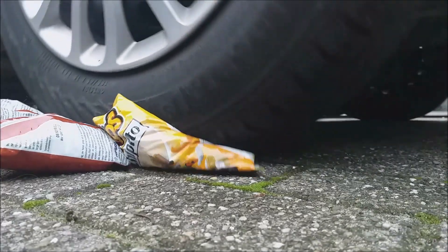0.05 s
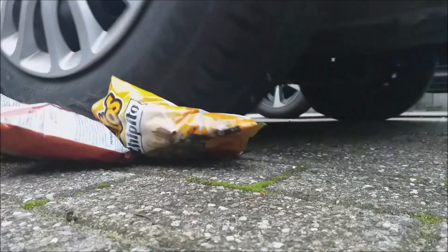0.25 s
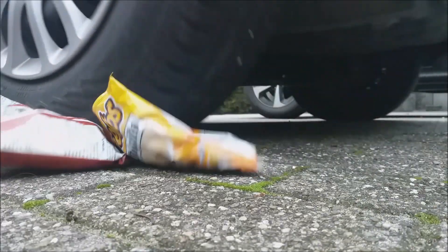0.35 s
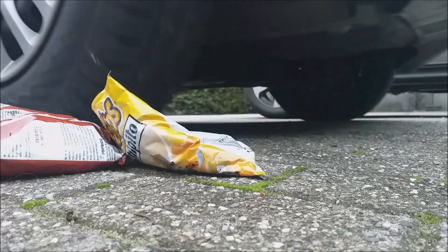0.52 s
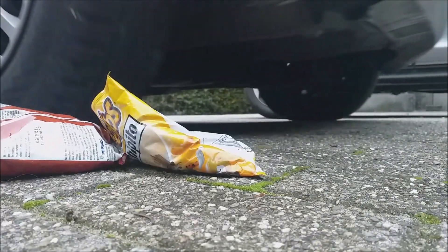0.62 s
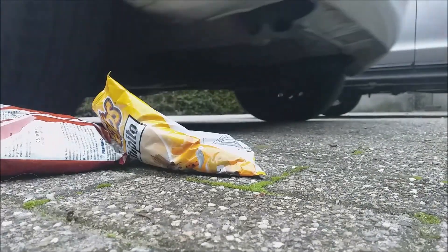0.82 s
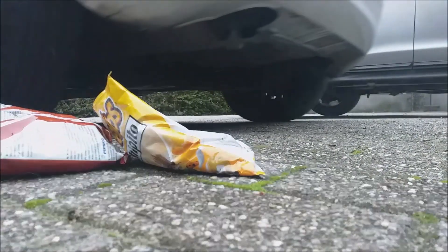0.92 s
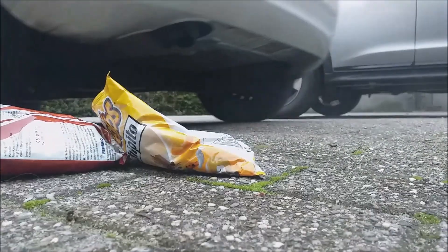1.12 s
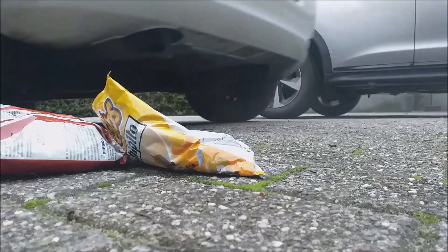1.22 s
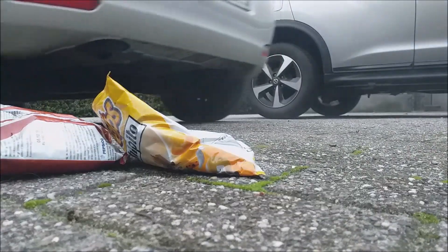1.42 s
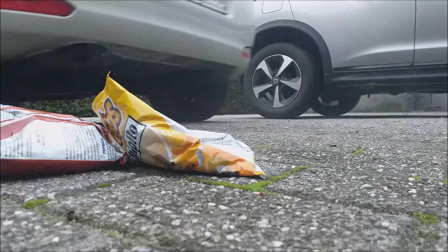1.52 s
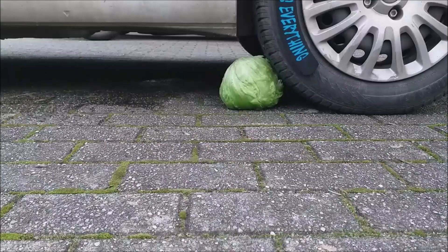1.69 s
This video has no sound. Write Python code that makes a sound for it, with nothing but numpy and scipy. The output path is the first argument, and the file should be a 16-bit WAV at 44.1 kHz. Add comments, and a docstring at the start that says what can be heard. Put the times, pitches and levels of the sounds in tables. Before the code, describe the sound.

A foil snack bag crackles loudly as a car rolls over it, bursts, and settles in faint ticks

```python
"""A car creeps over an air-filled snack packet close to the microphone: dense ringing grains crackle, foil snaps
in hiss and short tones, and a slipping sheet squeaks. The bag then bursts: pulses ring its hollow, with a
noise crack and scattered echoes. Foil settles in faint ticks over an idling engine of sine orders and street
air of coloured noise; the engine pulls a little harder late on. Just before the end the sound is cut,
leaving a thin, dying remainder, and comes back faint."""
import sys
import numpy as np
from scipy import signal
from scipy.fft import rfft, irfft
from scipy.io import wavfile

SR = 44100
rng = np.random.default_rng(int(sys.argv[2]) if len(sys.argv) > 2 else 0)


def attenuation_scalar(level_db):
    """Turn a level in dB into a linear amplitude multiplier (20 dB per decade)."""
    decades = np.asarray(level_db, float) / 20
    return 10 ** decades


def master_out(mix):
    """Clip the mix to full scale and print it as 16-bit PCM to the path in sys.argv[1]."""
    frames = np.transpose(np.atleast_2d(mix))
    ceiling = np.clip(frames, -1, 1)
    pcm = np.round(ceiling * 32767).astype(np.int16)
    wavfile.write(sys.argv[1], SR, pcm)


N = 77175

# colour of foil and crisps: [frequency_hz, density_db (per Hz, relative)]
FOIL_COLOUR = [(80, -45.5), (150, -12.5), (300, -4.5), (450, -8), (700, -1), (1000, -5), (2000, -4.5),
               (3800, -4.5), (5500, -7), (7800, -8.5), (9000, -21.5), (11000, -16), (15000, -17),
               (16500, -40)]


def rms_one(x):
    """Scales a signal to rms 1."""
    return x / np.sqrt(np.mean(x ** 2) + 1e-20)


def in_time(rows):
    """Draws straight lines between (second, value) points."""
    s, column = np.transpose(rows)
    return np.interp(np.arange(N) / SR, s, column)


def at_hz(points, hz):
    """Reads a (Hz, value) curve on a logarithmic frequency axis."""
    table_hz, values = np.transpose(points)
    return np.interp(np.log(hz), np.log(table_hz), values)


def drift(rate_hz):
    """Slow random wander of rms 1: noise through a double low-pass pole."""
    r = np.exp(-2 * np.pi * rate_hz / SR)
    wander = signal.lfilter([1], [1, -2 * r, r * r], rng.standard_normal(N + SR))
    return rms_one(wander[SR:])  # the first second lets the filter settle


def ring(clicks, hz, t60_s):
    """Two-pole resonator: a unit click starts a decaying sine of height 1."""
    r, w = attenuation_scalar(-60 / (t60_s * SR)), 2 * np.pi * hz / SR
    return signal.lfilter([0, np.sin(w)], [1, -2 * r * np.cos(w), r * r], clicks + 1e-18)


def dying(start_s, t60_s):
    """Envelope that jumps to 1 and decays by 60 dB in t60_s."""
    t = np.arange(N) / SR - start_s
    return (t >= 0) * attenuation_scalar(-60 * np.maximum(t, 0) / t60_s)


def high_pass(x, hz):
    """Second-order Butterworth bass cut."""
    return signal.sosfilt(signal.butter(2, hz, "high", fs=SR, output="sos"), x)


def coloured(x, spectrum):
    """White input through a causal (minimum-phase) filter given in dB per Hz; rms 1."""
    hz = np.maximum(np.arange(N // 2 + 1) * SR / N, 1)
    cepstrum = irfft(np.log(attenuation_scalar(at_hz(spectrum, hz))), N)
    fold = np.where(np.arange(N) < N / 2, 2., 0.)
    fold[0] = 1
    response = np.exp(rfft(cepstrum * fold))
    return rms_one(irfft(rfft(x) * response, N))


def crackle():
    """Dense clumped grains, each a few cycles at its own pitch, over the rustle of the whole sheet."""
    # pressure of the tyre on the bag, as crackle level: [time_s, level_db]
    crush = [(0, -54), (.034, -49.5), (.085, -54), (.12, -50.5), (.151, -54.5), (.157, -67.5), (.17, -51),
             (.285, -49), (.305, -52), (.398, -46), (.418, -50), (.444, -49), (.456, -54), (.4885, -56.5),
             (.491, -41), (.54, -55.5), (.6, -63), (.69, -70.5), (.775, -75), (.79, -80.5), (1.4, -90.5),
             (1.68, -75.5)]
    grains_per_s, grain_spread_db, grain_cycles = 11000, 4.0, 11.0  # a grain loses 60 dB in grain_cycles
    clump_db, clump_rate_hz, rustle_db = 1.2, 90, -4
    sizes = attenuation_scalar(grain_spread_db * np.minimum(rng.exponential(1, N), 5)) * rng.choice([-1, 1], N)
    clump = attenuation_scalar(clump_db * drift(clump_rate_hz))
    born = rng.random(N) < grains_per_s * clump / SR
    pitches_hz, dealt = np.geomspace(150, 15500, num=28), rng.integers(0, 28, N)
    grains = sum(ring(sizes * born * (dealt == k), hz, grain_cycles / hz) * hz
                 for k, hz in enumerate(pitches_hz))
    sheet = rms_one(grains) + attenuation_scalar(rustle_db) * rng.standard_normal(N)
    return attenuation_scalar(in_time(crush)) * clump * coloured(sheet, FOIL_COLOUR)


def snaps():
    """Each snap: a burst of foil hiss, duller for low snaps, that dies fast, with a short ring."""
    # single snaps and ticks of foil: [start_s, level_db, pitch_hz, hiss_db (relative to level_db)]
    snap_rows = [(0.016, -40, 1800, -12), (0.033, -32, 2950, -15), (0.072, -43, 2700, -14),
                 (0.0947, -37, 2230, -7), (0.1151, -30, 3900, -18), (0.1335, -47, 2310, 1),
                 (0.142, -41.5, 754, -9), (0.1762, -32, 4620, -13), (0.2074, -31, 4200, -9),
                 (0.2375, -37.5, 1490, -8), (0.2627, -39, 1610, -15), (0.3442, -36, 3930, -11),
                 (0.3529, -32.5, 3900, -13), (0.3787, -30.5, 7300, -12.5), (0.388, -27.5, 2590, -12),
                 (0.3992, -28, 2020, -16), (0.4135, -29, 3940, -10), (0.428, -26.5, 4070, -14),
                 (0.4326, -21, 7400, -28), (0.4362, -28, 3700, -18), (0.44, -35, 1980, -17),
                 (0.4441, -26.5, 4730, -14.5), (0.4752, -42, 1900, -5.5), (0.537, -39, 435, -32),
                 (0.582, -42, 594, -18), (0.5975, -41.5, 3750, -11.5), (0.604, -46, 372, -22),
                 (0.623, -52, 5080, -10), (0.634, -48.5, 603, -20), (0.649, -49, 5200, -6.5),
                 (0.6659, -41.5, 2400, -6), (0.666, -58, 704.6, -25), (0.682, -54, 650, -22),
                 (0.7196, -57, 1740, -2), (0.728, -51.5, 704, -18), (0.7558, -52, 2170, -6),
                 (0.7622, -55, 4500, -6), (0.7704, -55.5, 2360, -2), (0.8495, -56.5, 3240, -26),
                 (0.8632, -50, 2080, -21), (0.8843, -54.5, 1900, -8.5), (0.9271, -51.5, 1388, -17),
                 (1.0159, -63, 5500, -10), (1.03, -64, 5000, -9), (1.0423, -53.5, 1780, -11.5),
                 (1.056, -60, 3000, -14), (1.0978, -54, 1830, -28), (1.4722, -61, 1900, -5.5),
                 (1.5028, -61.5, 2450, -3), (1.5472, -52, 1600, -6.5), (1.6013, -50.5, 7600, -10),
                 (1.628, -56, 1680, -8.5)]
    hiss_t60_s, hiss_reach = 0.013, 3.5  # the hiss fades above hiss_reach times the pitch
    ring_cycles, ring_db, rise_cycles = 9, -1.5, 0.27
    t = np.arange(SR // 20) / SR
    out, hiss = np.zeros(N), coloured(rng.standard_normal(N), FOIL_COLOUR)
    for start_s, level_db, hz, hiss_db in snap_rows:
        i = int(start_s * SR)
        keep = np.exp(-2 * np.pi * hiss_reach * hz / SR)
        dull = signal.lfilter([1 - keep], [1, -keep], hiss[i:i + len(t)])
        rise = 1 - np.exp(-t * hz / rise_cycles)
        tone = attenuation_scalar(ring_db - 60 * t * hz / ring_cycles) * np.sin(2 * np.pi * hz * t) * rise
        burst_of_hiss = attenuation_scalar(hiss_db - 60 * t / hiss_t60_s) * dull
        out[i:i + len(t)] += attenuation_scalar(level_db) * (tone + burst_of_hiss)
    return out


def squeak():
    """Foil squeaks as it slips: a brief swelling tone with its octave."""
    start_s, length_s, pitch_hz, level_db, octave_db = .139, .036, 1725, -57.5, -1
    t = np.arange(N) / SR - start_s
    phase = 2 * np.pi * pitch_hz * t
    swell = np.sin(np.pi * np.clip(t / length_s, 0, 1))
    tones = np.sin(phase) + attenuation_scalar(octave_db) * np.sin(2 * phase)
    return attenuation_scalar(level_db) * np.sqrt(2) * swell * tones


def seam_and_hollow(burst):
    """The seam tears in quick pressure pulses, each with a slower dip, that ring the hollow."""
    # hollow of bag and wheel arch: [pitch_hz, level_db, t60_s]
    hollow = [(138, -28.5, 0.12), (193.4, -19.5, 0.073), (288, -27, 0.0765), (471.4, -6.5, 0.2),
              (733.3, -14.5, 0.077), (895, -21, 0.086), (1178, -14.5, 0.067), (1900, -21.5, .03),
              (2562, -21.5, 0.023), (3800, -25, .03)]
    pulse_s, suction_s, suction_share = .00025, .0008, 1.0
    t = np.arange(N) / SR
    pulses = sum(attenuation_scalar(db) * np.exp(-((t - s - pulse_s) / (pulse_s / 2)) ** 2) for s, db in burst)
    keep = np.exp(-1 / (suction_s * SR))
    suction = suction_share * signal.lfilter([1 - keep], [1, -keep], pulses)
    area = pulse_s / 2 * SR * np.sqrt(np.pi)  # of a pulse of height 1, in samples
    ringing = sum(attenuation_scalar(db) * ring(pulses / area, hz, t60_s) for hz, db, t60_s in hollow)
    return pulses - suction + ringing


def gulp():
    """The trapped air rings while the tear opens: a few swelling cycles, inverted."""
    start_s, length_s, pitch_hz, level_db = .4894, .007, 660, -25.5
    t = np.arange(N) / SR - start_s
    swell = np.sqrt(np.sin(np.pi * np.clip(t / length_s, 0, 1)) + 1e-15)
    return -attenuation_scalar(level_db) * swell * np.sin(2 * np.pi * pitch_hz * t)


def crack(burst_s):
    """Bright noise that starts just after the first pulse and dies fast."""
    level_db, t60_s, lag_s, from_hz = -31, 0.0095, .0006, 2000
    bright = high_pass(rng.standard_normal(N), from_hz)
    return attenuation_scalar(level_db) * bright * dying(burst_s + lag_s, t60_s)


def scattered_echoes(burst_s):
    """Echoes from under the car and off the walls: half-octave noise bands, each dying at its own pace."""
    # colour of the echoes: [frequency_hz, density_db (per Hz, relative)]
    scatter = [(50, -30.5), (100, -17.5), (170, -10.5), (300, -1.5), (450, -2.5), (750, -3), (1340, -13),
               (2650, -13.5), (4120, -23.5), (7230, -32.5), (16000, -36.5)]
    # how the echoes die: [frequency_hz, t60_s]
    scatter_t60 = [(60, .25), (300, .16), (700, .12), (2000, .13), (16000, .1)]
    level_db, build_s = -30, 0.0063
    white, edges = rng.standard_normal((2, N)), 60 * 2 ** np.arange(0, 8.1, .5)
    tail, power = 0, 0
    for k, (low, high) in enumerate(zip(edges, edges[1:])):
        hz = np.sqrt(low * high)
        band_pass = signal.butter(2, [low, high], "band", fs=SR, output="sos")
        # neighbouring bands take turns on two noises
        band = attenuation_scalar(at_hz(scatter, hz)) * signal.sosfilt(band_pass, white[k % 2])
        tail = tail + band * dying(burst_s, at_hz(scatter_t60, hz))
        power = power + np.mean(band ** 2)
    build = np.clip((np.arange(N) / SR - burst_s) / build_s, 0, 1) ** 2
    return attenuation_scalar(level_db) * build * tail / np.sqrt(power)


def pop():
    """The bag bursts: pulses in the hollow, gulp, crack and echoes, with the bass cut."""
    # steps of the tearing seam: [start_s, level_db (before the bass cut)]
    burst = [(.4889, -21), (.4901, -23), (.5002, -28)]
    burst_s = burst[0][0]
    out = seam_and_hollow(burst) + gulp() + crack(burst_s) + scattered_echoes(burst_s)
    return high_pass(out, 123)


def engine():
    """Orders of the engine cycle as sines, each wavering a little, lifted near the exhaust resonance."""
    # engine speed: [time_s, cycle_hz]
    speed = [(0, 21.21), (.5, 21.04), (.7, 20.87), (1.3, 21.05), (1.5, 21.7), (1.68, 22.25)]
    # reference level of the orders: [time_s, level_db]
    engine_level = [(0, -67.5), (.76, -67), (1.3, -69.5), (1.5, -70), (1.68, -70)]
    # what order six gains as the engine pulls: [time_s, gain_db]
    load = [(0, 0.5), (1.4, 3.5), (1.55, 8.5), (1.68, 14)]
    # orders: [multiple of the cycle rate, level_db (relative, before load and exhaust)]
    orders = [(2,-3.5),(4,3),(5,-26),(6,-12),(8,-20.5),(10,-19),(11,-29),(12,-11.5),(13,-22),(14,-18.5),(15,-13),(16,-19),(17,-19),(18,-13),(19,-13.5),(22,-21),(23,-22.5),(24,-27)]
    cycle_start = 0.42  # share of the cycle already run at the start
    pipe_hz, pipe_width_hz, pipe_db = 395.2, 17, 9  # exhaust resonance, stays as the speed changes
    order_lag, pipe_order = .03, 18.5  # phase lag grows with squared distance from pipe_order
    uneven_db, uneven_rate_hz = 1.2, 6.8
    cycle_hz = in_time(speed)
    turn = 2 * np.pi * (cycle_start + np.cumsum(cycle_hz) / SR)
    out = 0
    for k, db in orders:
        pull = in_time(load) * (k == 6)
        pipe = pipe_db / (1 + ((k * cycle_hz - pipe_hz) / pipe_width_hz) ** 2)
        level = attenuation_scalar(db + pull + pipe + uneven_db * drift(uneven_rate_hz))
        # odd orders turn a quarter: two unequal beats per cycle
        lag = np.pi / 2 * (k % 2) + np.pi * order_lag * (k - pipe_order) ** 2
        out = out + level * np.sin(k * turn - lag)
    return np.sqrt(2) * attenuation_scalar(in_time(engine_level)) * out


def street_air():
    """Coloured noise whose level wavers slightly."""
    # colour of the street air: [frequency_hz, density_db (per Hz, relative)]
    air = [(25, -18.5), (50, -10), (100, -6.5), (250, -0.5), (420, 0), (600, -9), (1200, -8.5),
           (2000, -13.5), (3000, -18.5), (7500, -26), (9000, -38), (16000, -37.5)]
    level_db, waver_db, waver_rate_hz = -75, .8, 16
    return attenuation_scalar(level_db + waver_db * drift(waver_rate_hz)) * coloured(rng.standard_normal(N), air)


def scene():
    """All sources at one microphone."""
    return (crackle() + snaps() + squeak() + pop() + engine() + street_air())[None]


def band_limit(x):
    """A steep low-pass at the top of the band."""
    return signal.sosfilt(signal.butter(12, 16820, fs=SR, output="sos"), x)


def record(dry):
    """The microphone loses deep bass; the sound is cut, and comes back faint and thin at the very end."""
    cut_s, cut_fade_s = 1.678, 0.00097
    left_db, left_t60_s = -16.5, 0.038  # thin remainder after the cut
    back_s, back_db, back_rise_s = 1.738, -16, 0.012
    t = np.arange(N) / SR
    heard = high_pass(dry, 90.4)
    thin = high_pass(dry, 250)
    left = attenuation_scalar(left_db) * dying(cut_s, left_t60_s)
    back = attenuation_scalar(back_db) * np.clip((t - back_s) / back_rise_s, 0, 1)
    fade = np.clip((cut_s - t) / cut_fade_s, 0, 1)
    return band_limit(heard * fade + thin * (left + back))


dry = scene()
out = record(dry)
master_out(out)
```